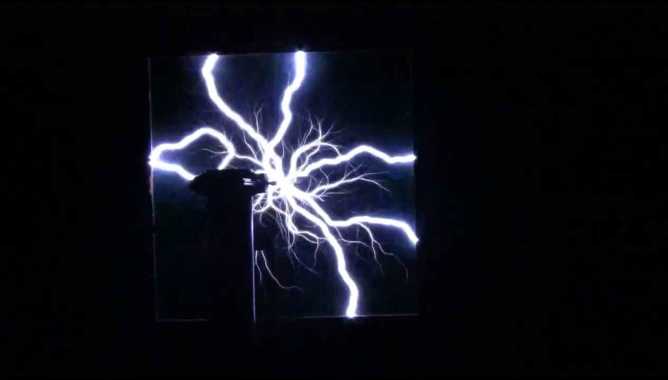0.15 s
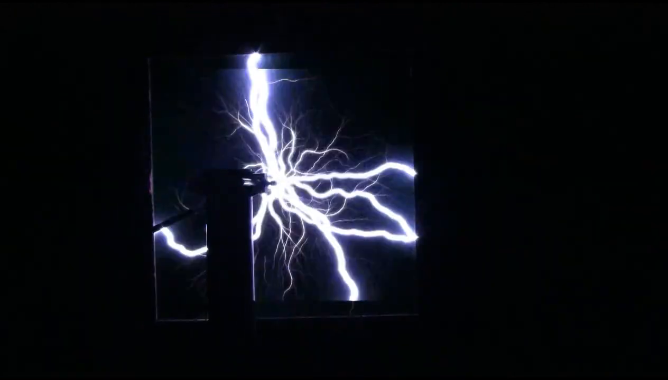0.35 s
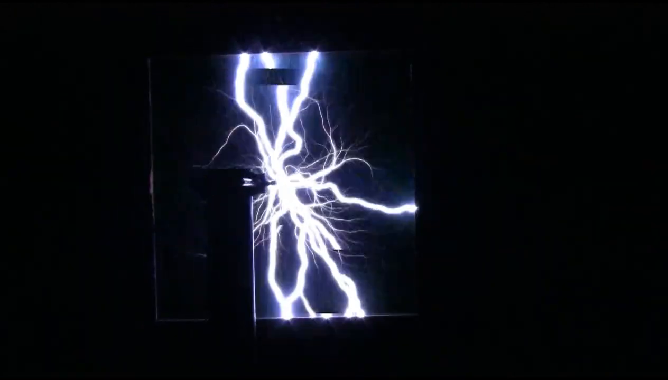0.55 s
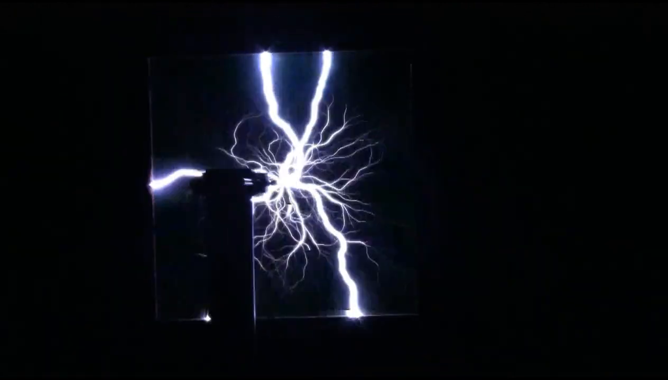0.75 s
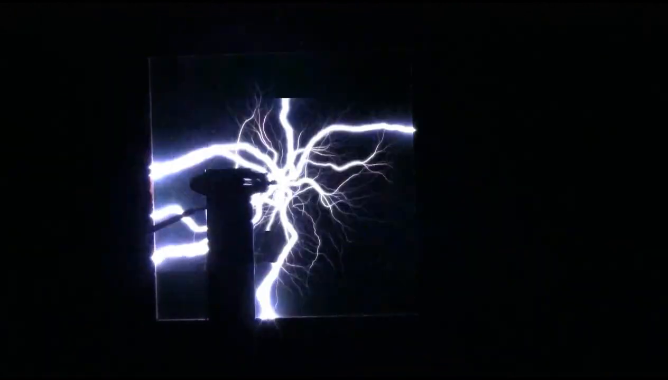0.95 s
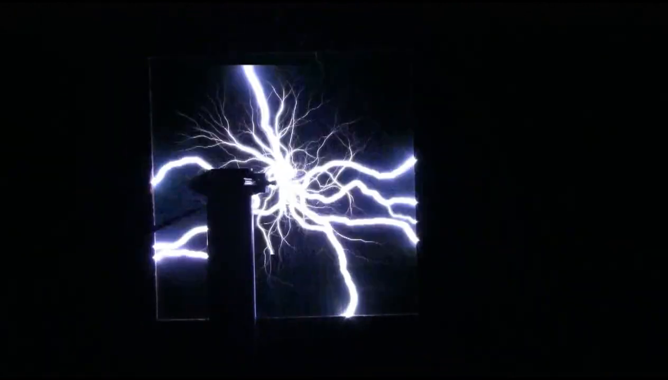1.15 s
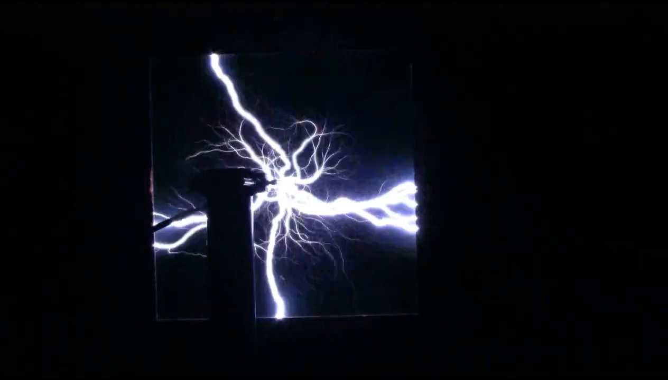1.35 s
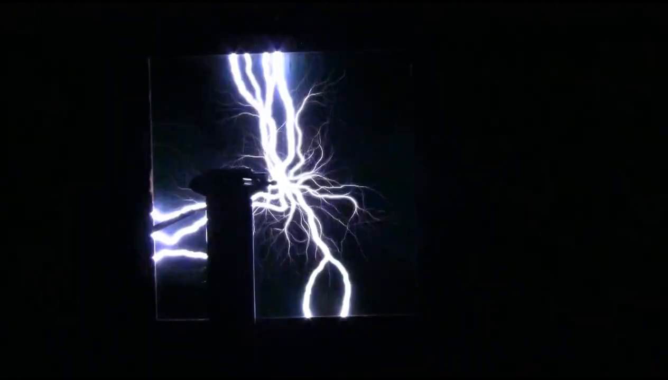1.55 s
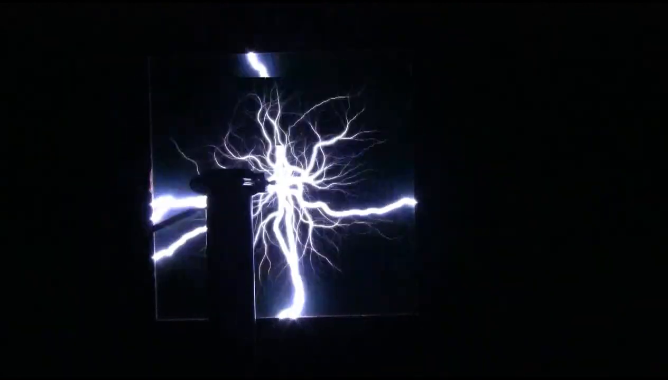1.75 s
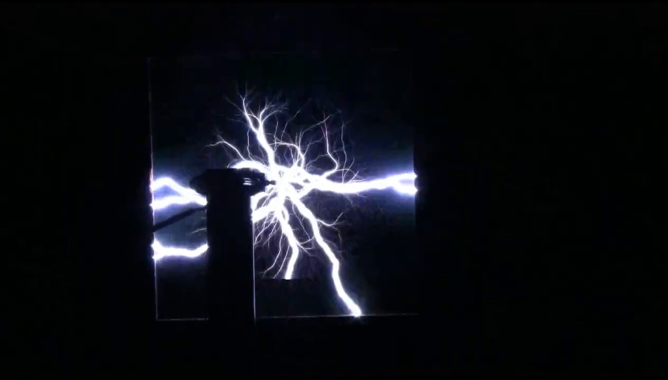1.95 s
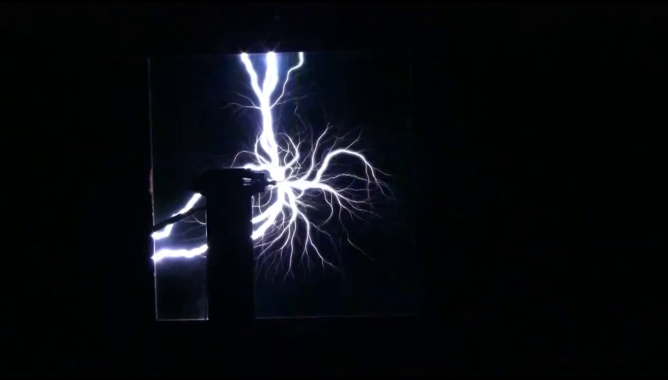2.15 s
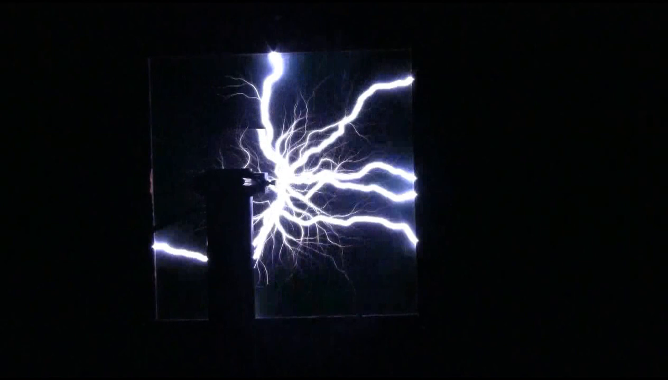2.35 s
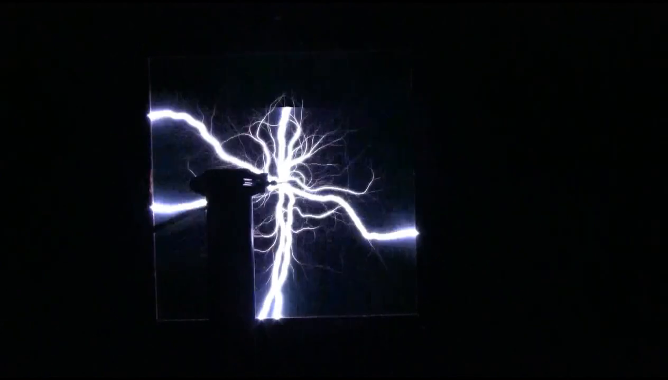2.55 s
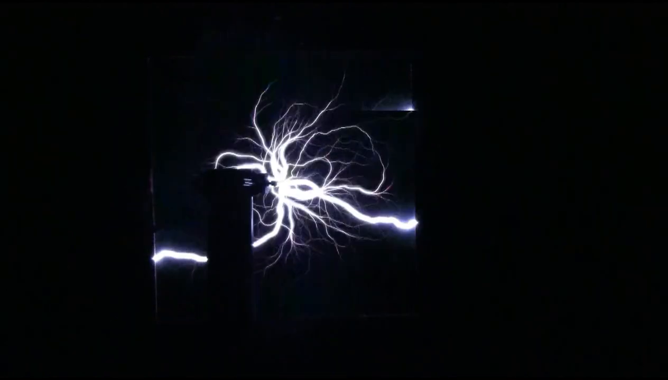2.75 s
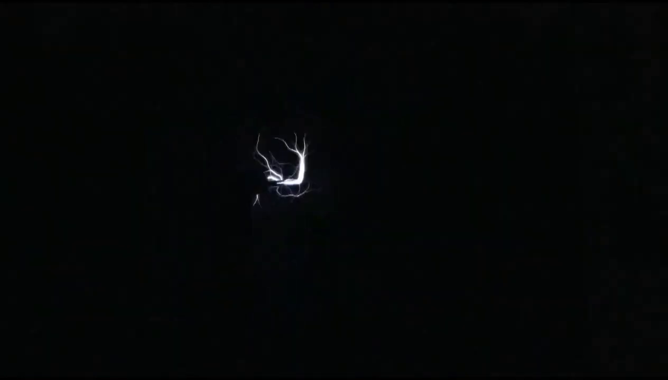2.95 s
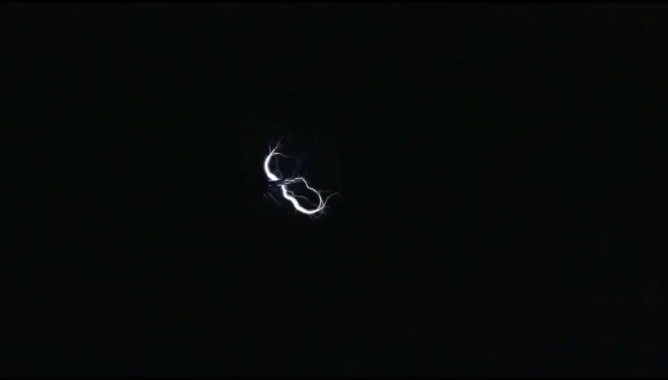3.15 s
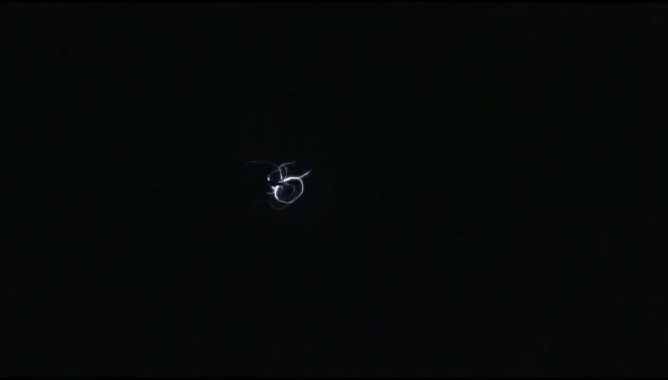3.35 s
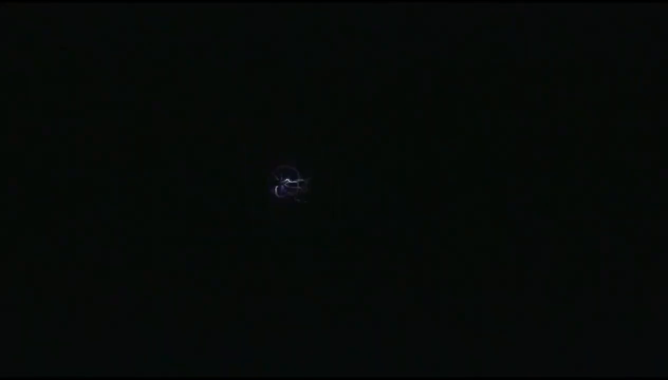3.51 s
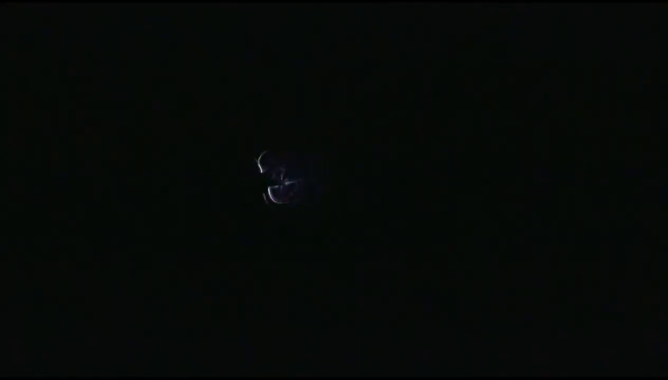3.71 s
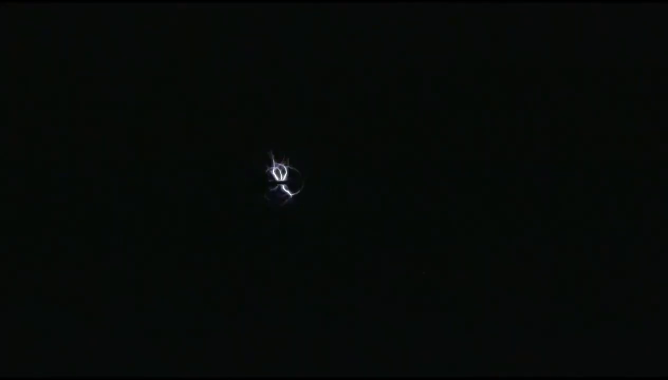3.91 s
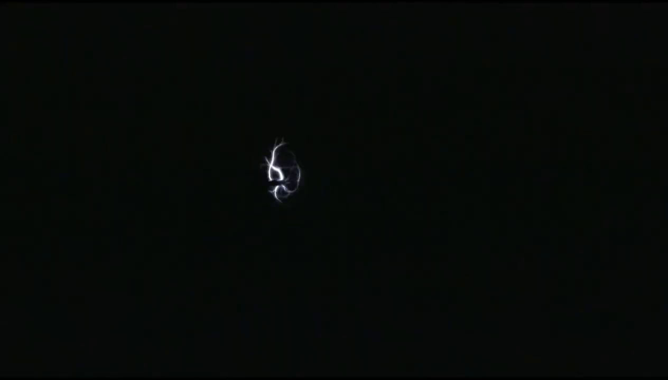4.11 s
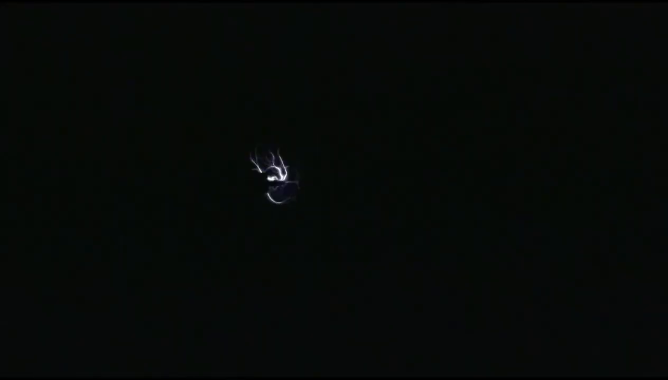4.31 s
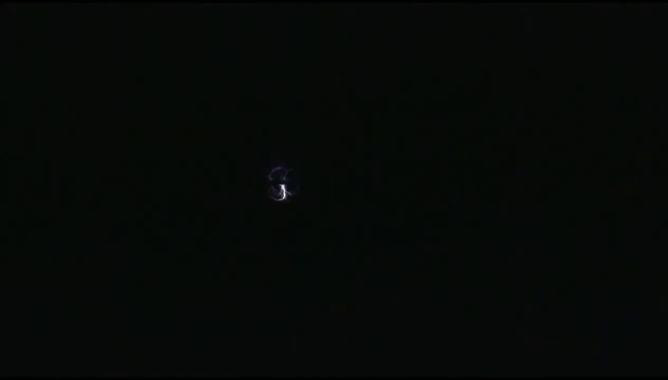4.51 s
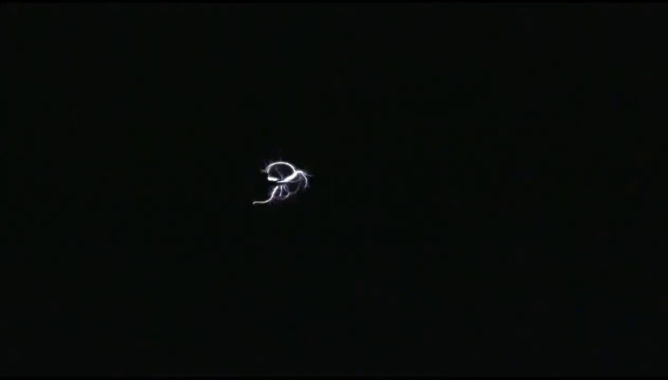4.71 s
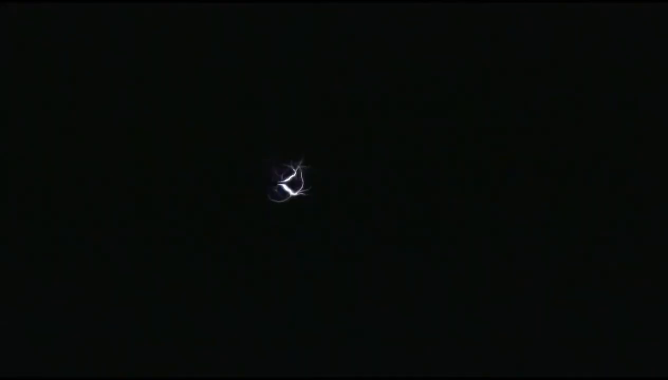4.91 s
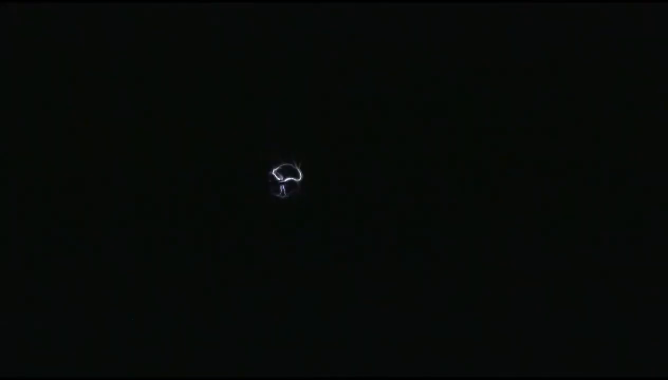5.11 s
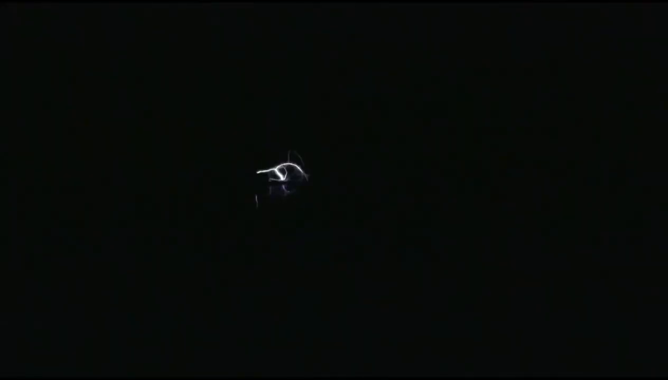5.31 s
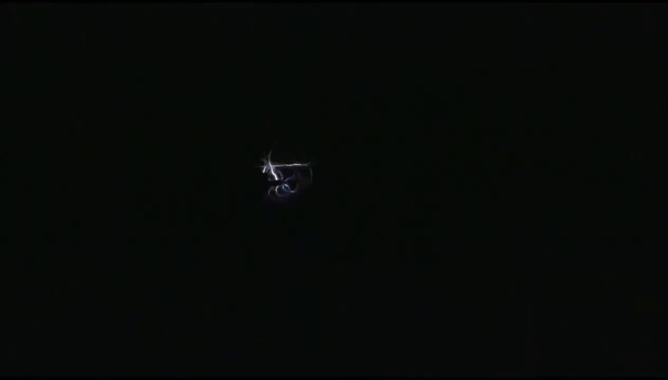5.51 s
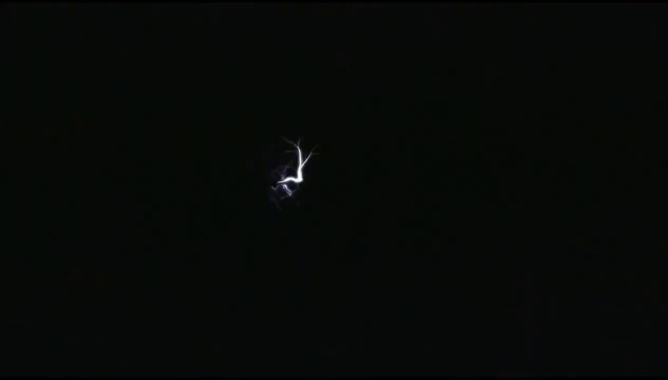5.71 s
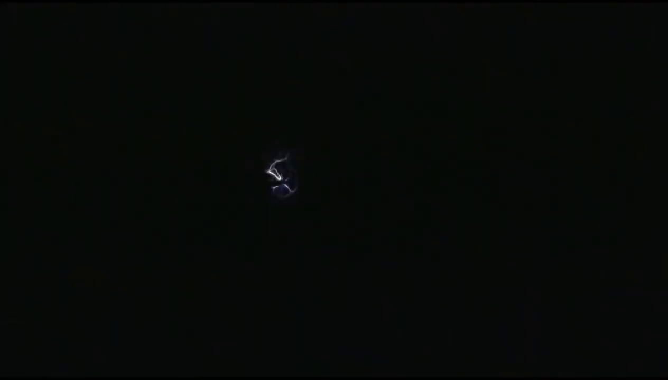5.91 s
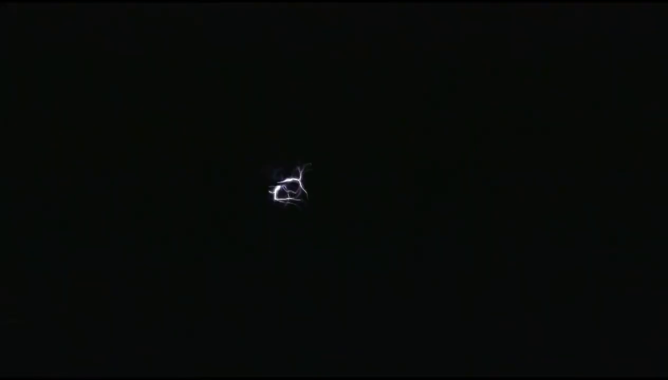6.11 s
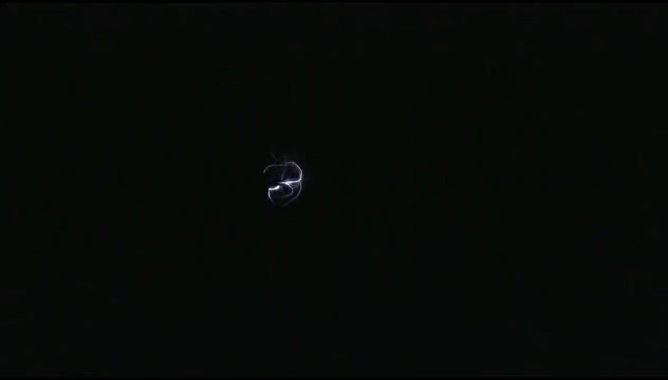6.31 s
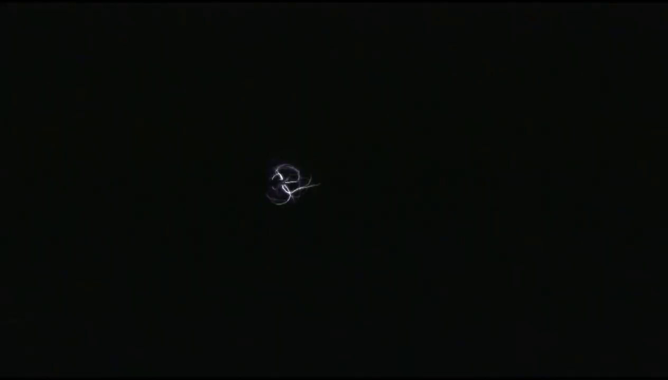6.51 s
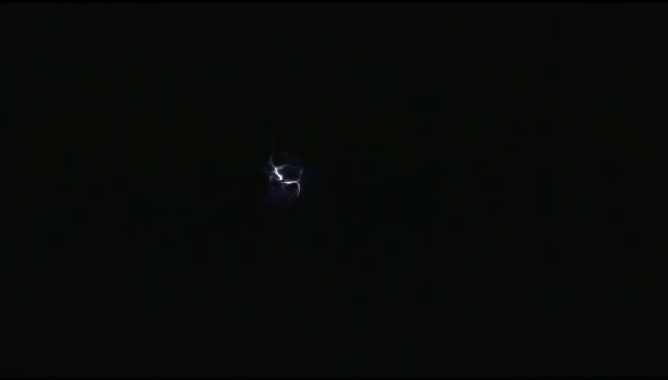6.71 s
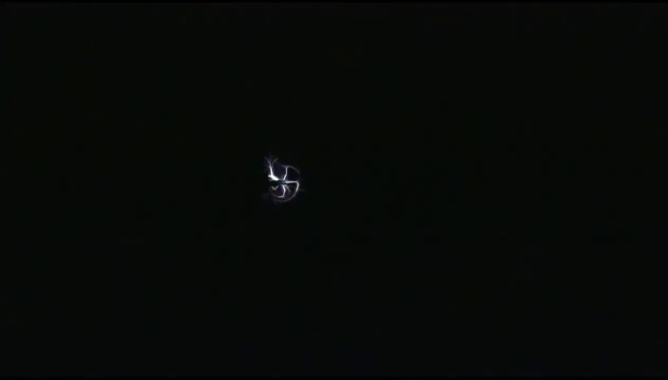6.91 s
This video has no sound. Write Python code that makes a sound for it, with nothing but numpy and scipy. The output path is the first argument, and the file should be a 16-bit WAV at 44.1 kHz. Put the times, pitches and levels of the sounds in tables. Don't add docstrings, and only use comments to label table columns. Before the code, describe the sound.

From 0 to 3 seconds, a high-voltage discharge roars close by on a glass plate in a large hall. Bright, gritty crackle bunches into a harsh buzz of about 100 pulses a second, continuous and abrasive. Irregular flashovers punch through it, short blunt low-mid thumps, several heavy ones each second, overloading the microphone and momentarily choking the treble. Around 3.0 the arcing sinks, and by 3.4 it is gone. Sharp streamer snaps take over, dense and strong until about 4.1, then a thinner, uneven patter near 50 ticks a second to the end at 7, with random louder cracks, weaker partners and brief lulls. Each tick is hard, dry and bright, trailed by tiny scattered reflections. A few, as near 3.9 and 5.4, have a duller body. Hall hiss decays, its treble fastest, ducking and creeping back with automatic gain to a faint airy floor. Wide stereo treble, centred bass.

```python
import sys
import numpy as np
from scipy import signal
from scipy.fft import rfft, irfft, next_fast_len
from scipy.io import wavfile
from scipy.ndimage import uniform_filter1d

SR = 44100
rng = np.random.default_rng(int(sys.argv[2]) if len(sys.argv) > 2 else 0)


def invert_db(x):
    u = np.asarray(x, float) / 20
    return 10 ** u


def int16_out(signal):
    q = np.round(np.clip(np.atleast_2d(signal).T, -1, 1) * 32767)
    wavfile.write(sys.argv[1], SR, q.astype(np.int16))


N = 306487
TIME = np.arange(N) / SR
SIZE = next_fast_len(N + SR)
HZ = np.maximum(np.arange(SIZE // 2 + 1) * SR / SIZE, 1.)
MAINS_HZ = 49.96


def rms_one(x):
    return x / np.sqrt(np.mean(x ** 2) + 1e-20)


def in_time(rows):
    s, *columns = np.transpose(rows)
    return [np.interp(TIME, s, c) for c in columns]


def at_hz(points):
    hz, level_db = np.transpose(points)
    return np.interp(np.log(HZ), np.log(hz), level_db)


def filtered(x, response):
    return irfft(rfft(x, SIZE) * response, SIZE)[..., :N]


def causal(points):
    cepstrum = irfft(np.log(invert_db(at_hz(points))), SIZE)
    cepstrum[1:SIZE // 2] *= 2
    cepstrum[SIZE // 2 + 1:] = 0
    return np.exp(rfft(cepstrum))


def centred(response):
    envelope = np.abs(signal.hilbert(irfft(response, SIZE)))
    advance = np.exp(2j * np.pi * HZ * envelope.argmax() / SR)
    return response / envelope.max() * advance


def clicks(events):
    s, peak_db = np.transpose(events)
    at = np.clip((s * SR).astype(int), 0, N - 1)
    main, signed = np.zeros((2, N))
    main[at] = invert_db(peak_db)
    signed[at] = invert_db(peak_db) * rng.choice([-1, 1], len(s))
    return main, signed


def half_cycles(lag_s, sharpness, odd):
    angle = 2 * np.pi * MAINS_HZ * (TIME - lag_s)
    bumps = np.exp(sharpness * (np.cos(2 * angle) - 1))
    return bumps * (1 - odd * (1 - np.cos(angle)) / 2)


def crackle(per_s, spread_db):
    sizes = invert_db(spread_db * np.minimum(rng.exponential(1, N), 4.5))
    return sizes * (rng.random(N) < per_s / SR)


# [t/s, level/dB]
ARC_LEVEL_DB = [
    (0, -19.5),
    (1.4, -20),
    (2.9, -20),
    (3.04, -24),
    (3.15, -28),
    (3.25, -40),
    (3.4, -90),
]
# [f/Hz, level/dB per Hz]
ARC_COLOUR_DB = [(410, -32.5), (700, -6.5), (1180, -4.5), (2120, -1.5), (2470, 0.5), (3520, -5), (5690, 3),
                 (7770, 0), (8740, -5.5), (10600, -3), (12300, -13.5), (15100, -5.5), (15700, -55)]


def arcs(duck):
    per_s = 9000 * half_cycles(lag_s=0.00026, sharpness=.8, odd=.05)
    branches = [crackle(per_s, spread_db=3.0) * rng.choice([-1, 1], N) for _ in range(2)]
    coloured = rms_one(filtered(np.array(branches), causal(ARC_COLOUR_DB)))
    return invert_db(in_time(ARC_LEVEL_DB)[0]) * duck * coloured


# [f/Hz, level/dB per Hz]
THUMP_COLOUR_DB = [(18, -73), (30, -20), (70, -24), (196, -3.5), (335, 2), (1300, -6), (1690, -88),
                   (2860, -120)]


def flashovers():
    strong, signed = clicks(all_flashovers())
    small = crackle(200 * half_cycles(lag_s=.0008, sharpness=2.5, odd=0), spread_db=2.0)
    small = small * rng.choice([-1, 1], N)
    signed = signed + invert_db(-39) * small * (TIME < 3)
    swing = centred(causal(THUMP_COLOUR_DB) / (1 + 1j * HZ / 1500) ** 2)
    quick_swing = swing * 1j * HZ / (HZ + 700)
    quick = rng.random(N)
    thumps = filtered(signed * (1 - quick / 2), swing) + filtered(signed * quick, quick_swing)
    choke = np.convolve(strong, np.hanning(90), "same")
    return invert_db(2.5) * thumps, 1 / (1 + 3.0 * choke)


# [t/s, peak level/dB]
FLASHOVER_PEAK_DB = [(.0112, -11), (.1805, -11), (.2206, -10), (.3419, -16), (.3616, -10.5), (.7025, -11),
                     (.7609, -13), (.7911, -14), (.8399, -11.5), (.8605, -11.5), (.9118, -8.5),
                     (1.0618, -12.5), (1.1012, -12), (1.2211, -8.5), (1.3615, -12), (1.5121, -14.5),
                     (1.7912, -13.5), (1.8637, -13), (2.0715, -8.5), (2.1929, -13), (2.2317, -11),
                     (2.3026, -12), (2.352, -10.5), (2.4642, -10), (2.5521, -10.5), (2.6322, -12),
                     (2.643, -8.5), (2.7334, -14), (2.824, -10), (2.8837, -13)]
MIDDLING_S = [.0928, .1691, .2411, .2926, .3508, .3713, .4127, .4308, .4525, .5017, .6636, .711, .7215,
              .9593, 1.0536, 1.0919, 1.386, 1.4419, 1.4515, 1.5522, 1.6024, 1.6755, 1.9042, 1.9527, 2.0337,
              2.2538, 2.3212, 2.4534, 2.5742, 2.7831]


def all_flashovers():
    middling = [(s, -14) for s in MIDDLING_S]
    listed = FLASHOVER_PEAK_DB + middling
    lighter = [strikes(listed, 0, 2.99, inception_s=lag_s, wait_s=.004, chance=.7, level_db=-20, spread_db=4.5)
               for lag_s in (-.001, .009)]
    return listed + lighter[0] + lighter[1]


# [t/s, length/s]
LULLS_S = [(.025, .04), (.135, .03), (.67, .028), (1.125, .065), (1.245, .035), (1.39, .045), (1.455, .05),
           (1.68, .04), (1.795, .065), (1.958, .07), (2.075, .07), (2.355, .055), (2.83, .12), (3.43, .02),
           (3.49, .015), (3.63, .02), (3.69, .02), (4.51, .02), (6.105, .03), (5.07, .04), (5.31, .02),
           (5.63, .04), (5.95, .04), (6.035, .04), (6.27, .02), (6.39, .02), (5.75, .02), (6.71, .025),
           (6.77, .025), (6.86, .02)]


def strikes(listed, start_s, end_s, inception_s, wait_s, chance, level_db, spread_db):
    lull_db = 9.5
    cycle = np.arange(int(N / SR * MAINS_HZ))
    wait, odds, size = rng.random((len(cycle), 3)).T
    s = cycle / MAINS_HZ + inception_s + wait_s * wait
    resting = sum((s > begin) & (s < begin + length) for begin, length in LULLS_S)
    taken = np.abs(s[:, None] - np.array(listed)[:, 0]).min(axis=1) < .004
    keep = (odds < chance) & (s > start_s) & (s < end_s) & ~taken
    peak_db = level_db - lull_db * resting + spread_db * (2 * size - 1)
    return list(zip(s[keep], peak_db[keep]))


# [f/Hz, level/dB per Hz]
STREAMER_COLOUR_DB = [(100, -39), (500, -16.5), (900, -10), (2400, -5), (3500, -8.5), (4600, -2), (5800, 3),
                      (7400, 3.5), (8700, -2.5), (10300, 1.5), (12500, -2), (13800, 0.5), (15700, 0),
                      (17000, -41)]
# [t/s, peak level/dB]
LONG_PEAK_DB = [
    (3.9014, -13),
    (4.9006, -36),
    (4.9615, -27),
    (5.1217, -46),
    (5.2808, -24),
    (5.4414, -17),
    (6.002, -19),
    (6.3029, -40),
    (6.4416, -17),
    (6.7622, -33),
]


def streamers():
    sharp, signed = clicks(all_streamers())
    faint = crackle(1500 * half_cycles(lag_s=-.003, sharpness=2.0, odd=.6), spread_db=2.6)
    faint_db = -28.5 + 4.6 * np.exp(-np.abs(TIME - 3) / 0.26)
    sharp = sharp + invert_db(faint_db) * faint * (TIME > 3)
    minimum = causal(STREAMER_COLOUR_DB)
    colour = centred(minimum ** .5 * invert_db(at_hz(STREAMER_COLOUR_DB) / 2))
    branches = invert_db(-9) * scatter(sharp, t60=.0012) + invert_db(-9.5) * scatter(sharp, t60=.03)
    shocks = filtered(branches - np.array([sharp, .5 * signed]), invert_db(1.0) * colour * np.exp(.45j))
    body = centred(minimum / (1 + 1j * HZ / 1500) ** 2)
    return shocks - filtered(clicks(LONG_PEAK_DB)[0], body)


# [t/s, peak level/dB]
SINKING_PEAK_DB = [(3.1199, -3), (3.2194, -5), (3.2612, -27), (3.2809, -7), (3.2899, -1), (3.3193, -11),
                   (3.359, -6), (3.392, -2), (3.4711, -4), (3.5106, -9), (3.5591, -2), (3.6003, -2),
                   (3.659, -4), (3.6791, -3), (3.712, -1), (3.7181, -8.5), (3.7525, -8), (3.7595, 0),
                   (3.771, -2), (3.819, -2), (3.821, -5), (3.8302, -7), (3.9014, -0.5), (3.932, -5),
                   (3.9611, -5.5), (4.0402, -6), (4.0608, -3), (4.0802, 1), (4.1011, -4.5), (4.1193, -5)]
# [t/s, peak level/dB]
LEADING_PEAK_DB = [(4.2198, -4), (4.2993, -5), (4.3593, -7), (4.4417, -1.5), (4.6605, -5), (4.8008, -5),
                   (4.9007, -0.5), (4.9602, -0.5), (5.0002, -4.5), (5.0408, -4.5), (5.122, -1.5),
                   (5.1416, -4), (5.24, -4.5), (5.4414, -4), (5.542, -2), (5.6207, -5.5), (5.7822, -7),
                   (5.824, -3), (5.8412, -4), (5.9203, -3), (6.002, -5.5), (6.083, -2), (6.142, -2.5),
                   (6.1814, -7.5), (6.3032, -7), (6.3617, -1.5), (6.4416, -8), (6.462, -6), (6.762, -1.5),
                   (6.8223, -2.5)]
# [t/s, peak level/dB]
OPPOSITE_PEAK_DB = [(4.2313, -3), (4.293, -5), (4.3314, -7), (4.4502, -12), (4.4924, -6), (4.5318, -5.5),
                    (4.774, -8), (4.871, -7), (4.932, -8), (4.9925, -6), (5.112, -10), (5.1725, -7),
                    (5.2128, -11), (5.4344, -2.5), (5.4719, -6), (5.5112, -4), (5.5539, -3), (5.6113, -6),
                    (5.6735, -5.5), (5.7335, -9), (5.8327, -7), (6.0124, -4.5), (6.0913, -14),
                    (6.2135, -4.5), (6.2336, -5), (6.492, -12), (6.6538, -7.5), (6.8145, -2), (6.8341, -3),
                    (6.8535, -3.5)]


def all_streamers():
    strong = SINKING_PEAK_DB + LEADING_PEAK_DB + OPPOSITE_PEAK_DB
    leading = strikes(strong, 3.03, 7, inception_s=-.0043, wait_s=.002, chance=1, level_db=-8.5, spread_db=4.5)
    sinking = strikes(strong, 3.03, 3.55, inception_s=.0055, wait_s=.004, chance=.9, level_db=-7, spread_db=3.5)
    opposite = strikes(strong, 3.55, 7, inception_s=.007, wait_s=.002, chance=.4, level_db=-14, spread_db=4)
    sinking += strikes([(0, 0)], 3.03, 3.43, inception_s=-.002, wait_s=.004, chance=.7, level_db=-9, spread_db=4)
    partners = []
    draw = rng.random((200, 3))
    for (s, db), (odds, gap, weak) in zip(LEADING_PEAK_DB + SINKING_PEAK_DB + leading, draw):
        if odds < .55 and db > -9:
            side = np.sign(.38 - odds)
            partners.append((s - side * (.001 + .0014 * gap), -8 - 8 * weak))
    return strong + leading + sinking + opposite + partners


def scatter(train, t60):
    fall = invert_db(-120 / (t60 * SR))
    power = signal.lfilter([0, 0, 0, 0, 1 - fall], [1, -fall], train ** 2 + 1e-18)
    return np.sqrt(power) * rng.standard_normal((2, N))


def echoes(x, t60, first_s):
    t = np.arange(SR // 2) / SR
    tail = rng.standard_normal((2, len(t))) * invert_db(-60 * t / t60) * (t > first_s)
    return filtered(x, rfft(tail / np.sqrt(np.sum(tail[0] ** 2)), SIZE))


# [f/Hz, level/dB per Hz]
HALL_COLOUR_DB = [(24, -67), (150, -26), (300, -18), (480, -8.5), (930, -7), (1600, -7), (2450, -6.5),
                  (3500, -6.5), (5700, 1), (7700, 1.5), (8700, -2), (10500, -1.5), (12400, -3), (15700, -4)]


def hall():
    wash = rfft(rng.standard_normal((2, N)), SIZE) * invert_db(at_hz(HALL_COLOUR_DB))
    low = 1 / (1 + (HZ / 550) ** 4)
    high = 1 / (1 + (3500 / HZ) ** 6)
    ranges = zip((low, 1 - low - high, high), hall_levels())
    return sum(level * rms_one(irfft(wash * part, SIZE)[:, :N]) for part, level in ranges)


# [level under arcs/dB, level as arcs stop/dB, fall/dB per s, floor level/dB]
HALL_RANGES_DB = [
    (-43.5, -52, 10.5, -69),
    (-28, -27, 14, -45),
    (-21, -23, 33, -41.5),
]


def hall_levels():
    arcs_stop_s, recovery_db, recovery_s = 2.985, 9, 0.82
    after = np.maximum(TIME - arcs_stop_s, 0)
    fade = np.clip(after / 0.042, 0, 1)
    gain_db = recovery_db * np.sin(np.pi / 2 * np.minimum(after / recovery_s, 1)) ** 2
    levels = []
    for loud_db, stop_db, fall_db_per_s, floor_db in HALL_RANGES_DB:
        level_db = loud_db + (stop_db - loud_db) * fade + gain_db - fall_db_per_s * after
        levels.append(np.hypot(invert_db(level_db), invert_db(floor_db)))
    return levels


# [t/s, depth level/dB]
DUCK_DEPTH_DB = [(3.039, 1.5), (3.16, 0.5), (3.24, 1), (3.43, 3), (3.49, -0.5), (3.76, 6.5), (4.12, 4.5),
                 (4.34, 1.5), (4.51, 2.5), (4.83, 6), (5.08, 2.5), (5.29, 5), (5.45, 0), (5.63, 3),
                 (5.86, 1), (6.03, -1), (6.26, 4.5), (6.39, 2.5), (6.51, 3.5)]


def gain_control(release_s):
    cut_db = sum(depth_db * np.exp(-np.maximum(TIME - s, 0) / release_s) * (TIME > s)
                 for s, depth_db in DUCK_DEPTH_DB)
    return invert_db(-uniform_filter1d(cut_db, size=200))


# [f/Hz, side over mid level/dB]
PORT_SIDE_DB = [(50, -12), (120, -20), (400, -28), (2600, -21), (4400, -14), (6500, -7.5), (8100, -2),
                (11000, 3.5), (15000, 3.5)]


def ports(mid, diffuse):
    lag_s = 0.000143
    over = invert_db(at_hz(PORT_SIDE_DB))
    delayed = filtered(mid, 0.44 * over * np.exp(-2j * np.pi * HZ * lag_s))
    side = delayed + filtered(diffuse, 0.77 * over)
    return np.array([mid + side, mid - side])


def self_noise(level_db):
    lumps = invert_db(11.0 * rms_one(filtered(rng.standard_normal(N), 1 / (1 + (HZ / 12) ** 2))))
    rumble = filtered(rng.standard_normal((2, N)), (HZ > 18) / (1 + 1j * HZ / 70) ** 2)
    return invert_db(level_db) * rms_one(lumps * rumble)


def scene():
    thumps, duck = flashovers()
    direct = streamers()
    far = invert_db(-16.0) * echoes(direct[0], t60=0.21, first_s=0.0023) + duck * hall()
    spread = arcs(duck) + direct + gain_control(release_s=0.083) * far
    return ports(spread[0] + thumps, spread[1] + 0.073 * np.roll(thumps, 300))


def roll_off(x):
    return signal.sosfilt(signal.butter(12, 15760, fs=SR, output="sos"), x)


def record(dry):
    cutoff_hz = 15720
    bass_cut = signal.butter(2, 60.0, "high", fs=SR, output="sos")
    x = signal.sosfilt(bass_cut, dry) + self_noise(level_db=-75.0)
    x = filtered(np.tanh(x), np.clip((cutoff_hz - HZ) / 40 + 1, 0, 1))
    return roll_off(x)


dry = scene()
out = record(dry)
int16_out(out)
```